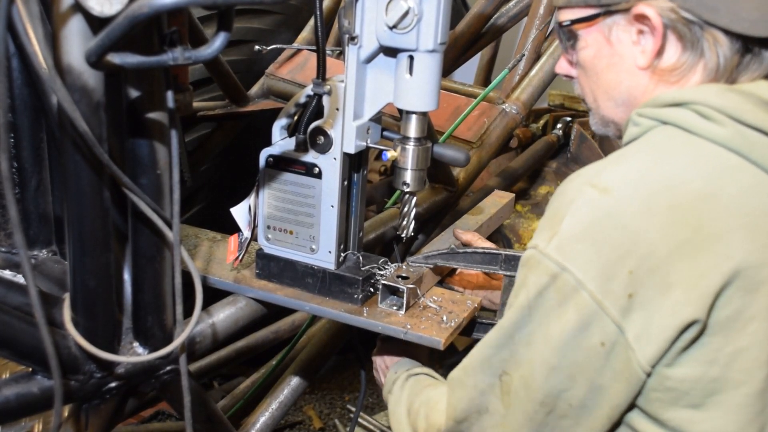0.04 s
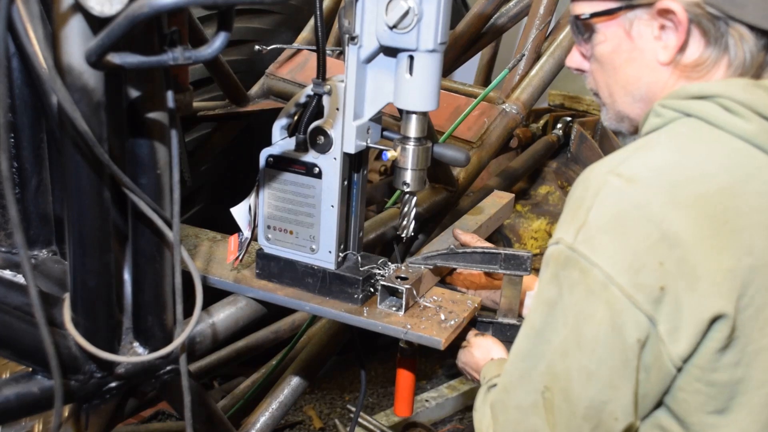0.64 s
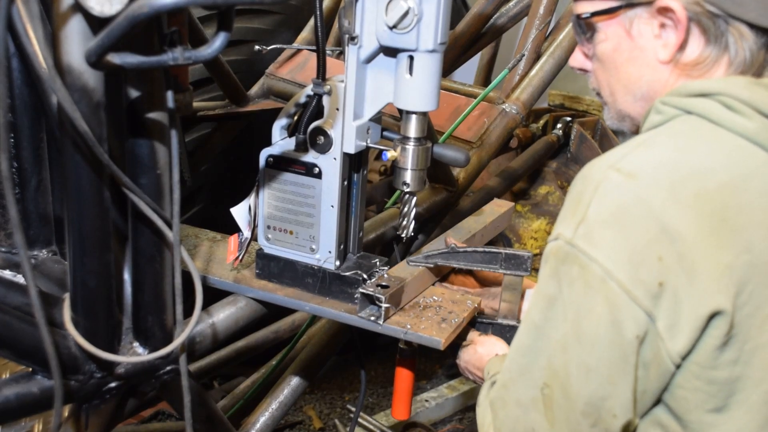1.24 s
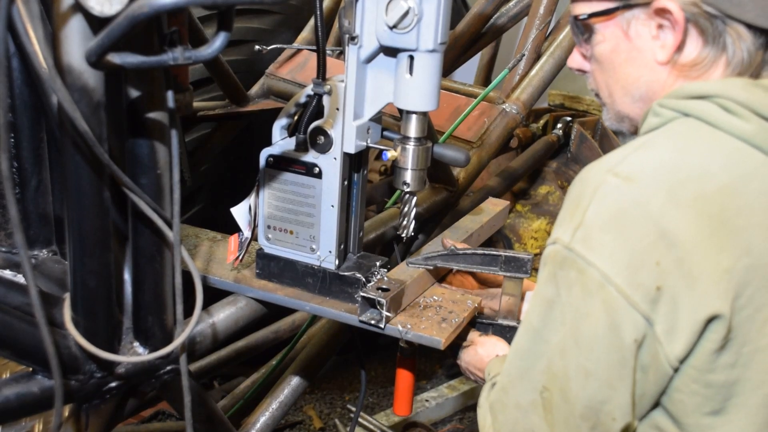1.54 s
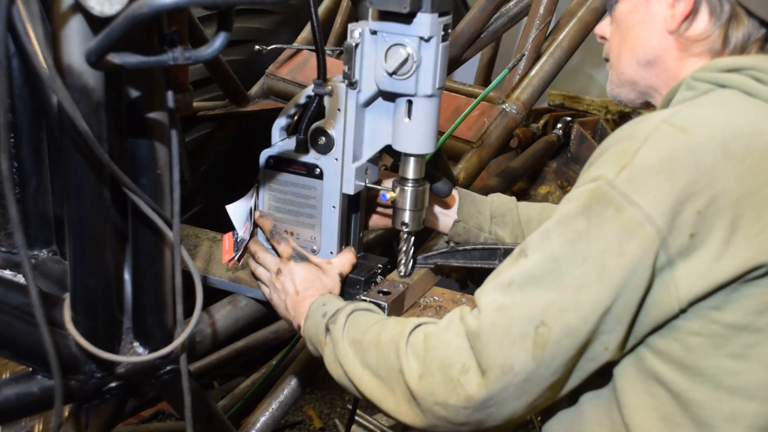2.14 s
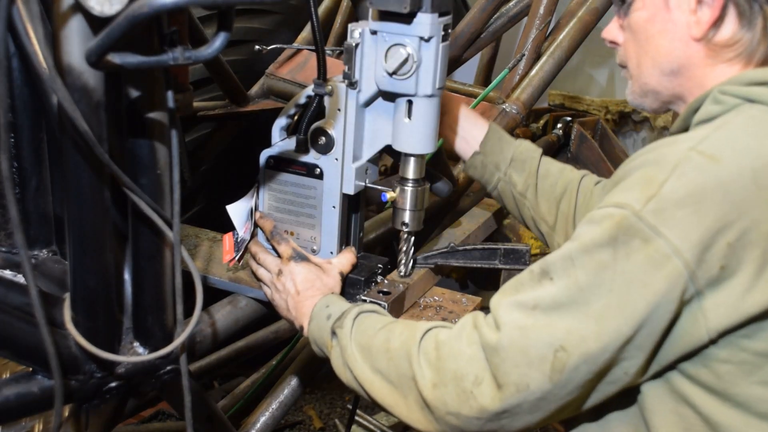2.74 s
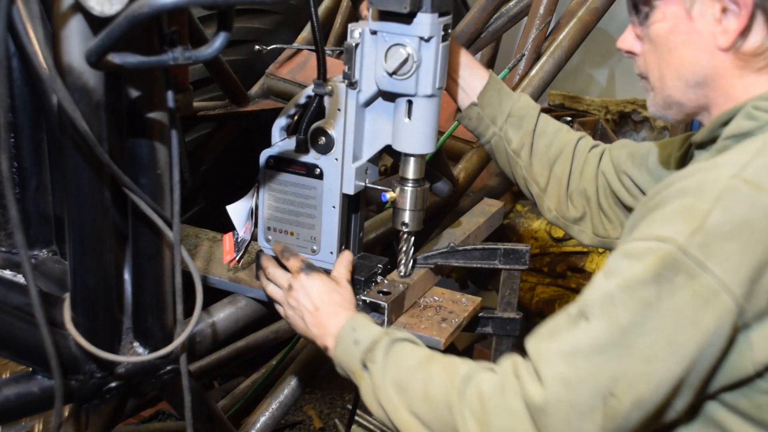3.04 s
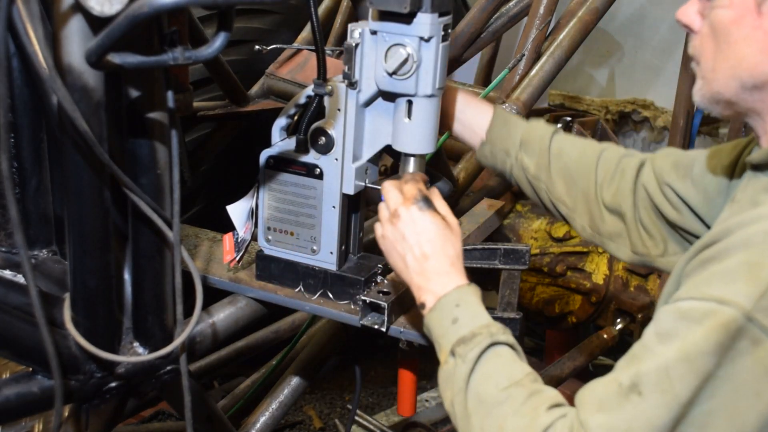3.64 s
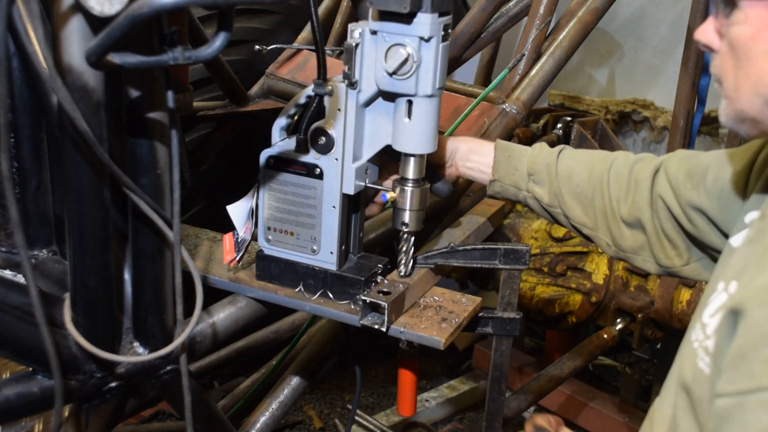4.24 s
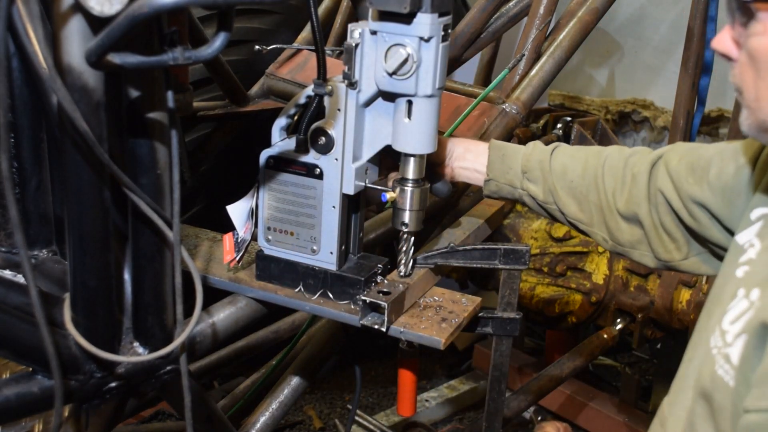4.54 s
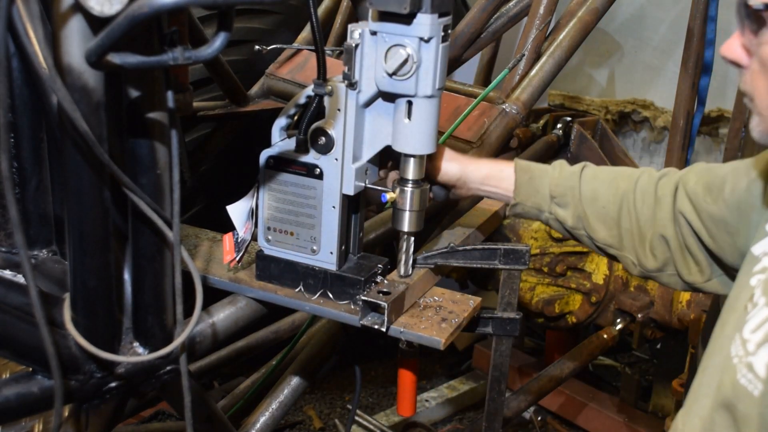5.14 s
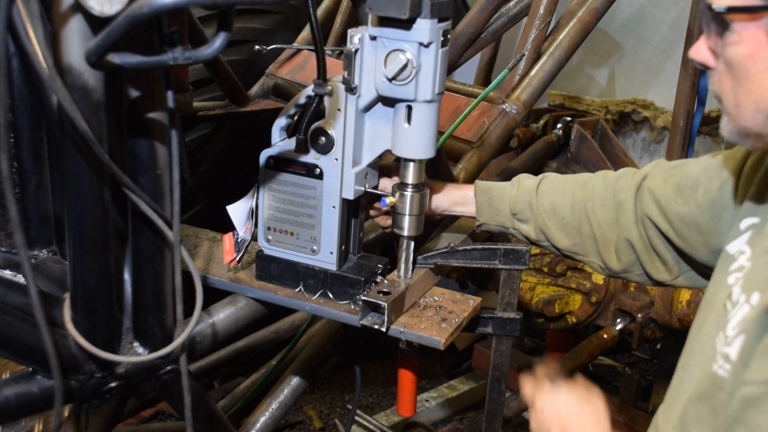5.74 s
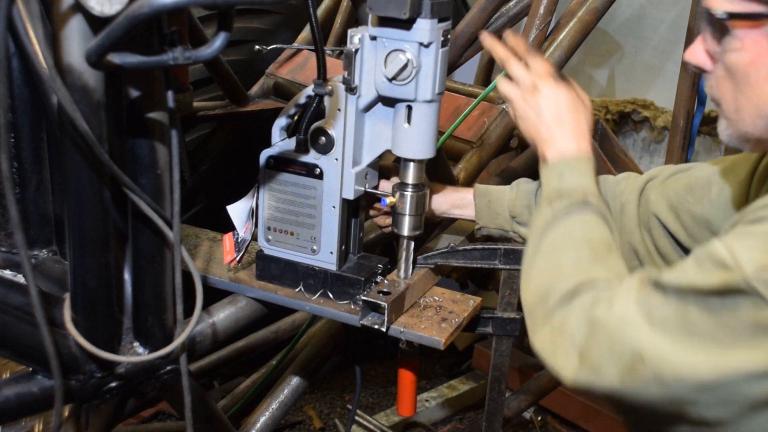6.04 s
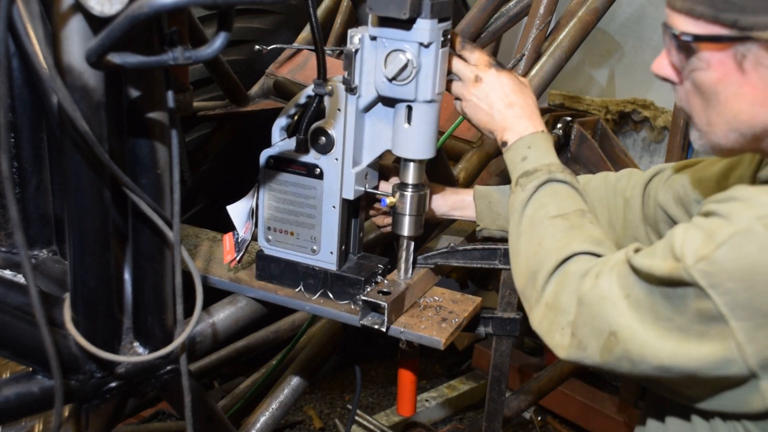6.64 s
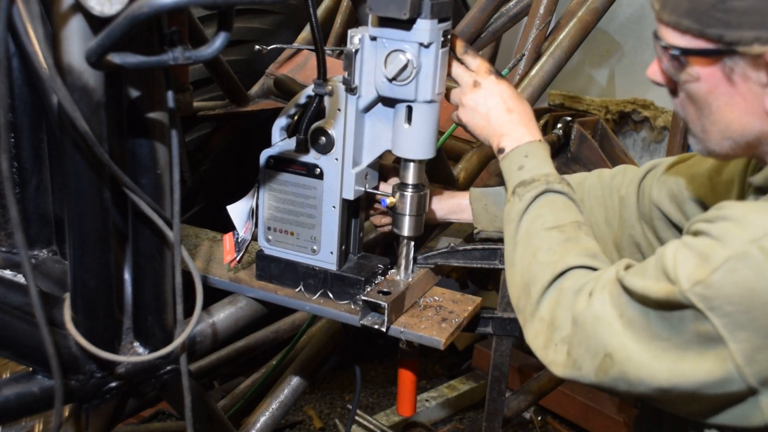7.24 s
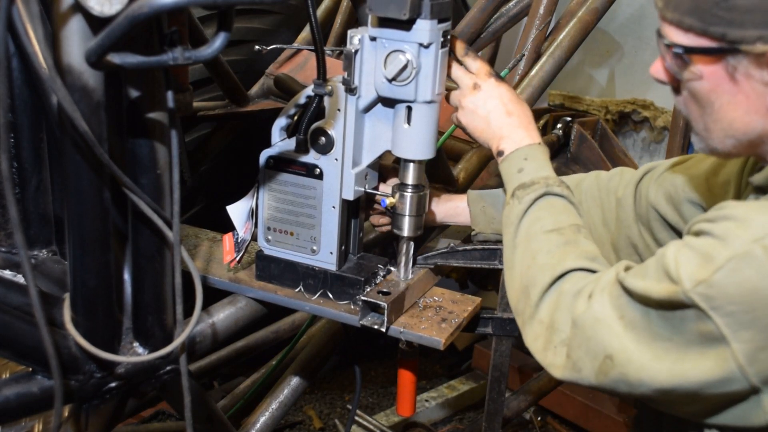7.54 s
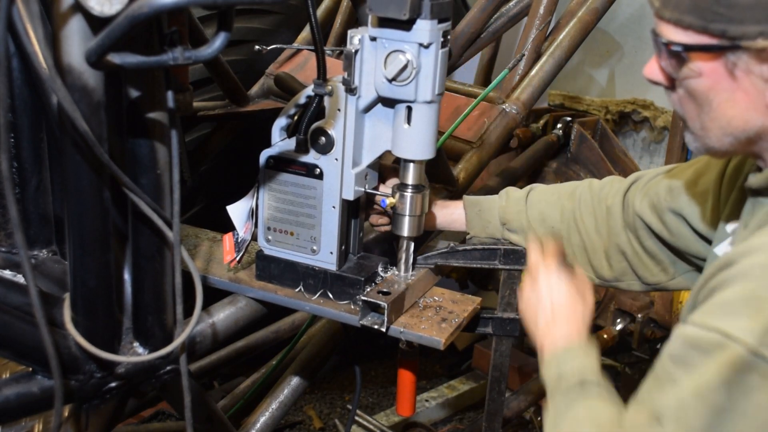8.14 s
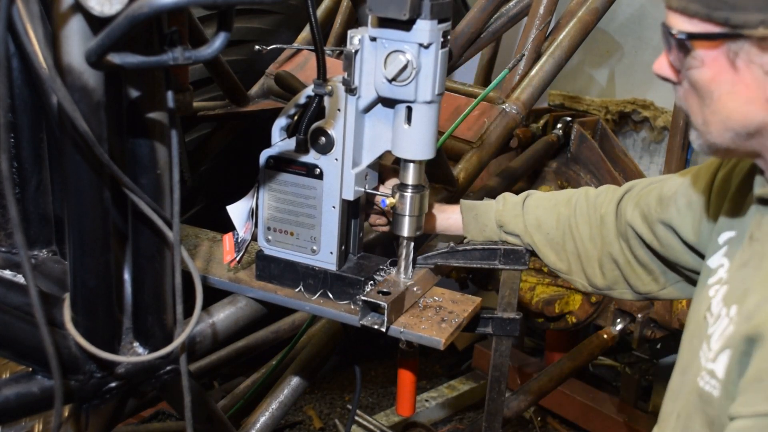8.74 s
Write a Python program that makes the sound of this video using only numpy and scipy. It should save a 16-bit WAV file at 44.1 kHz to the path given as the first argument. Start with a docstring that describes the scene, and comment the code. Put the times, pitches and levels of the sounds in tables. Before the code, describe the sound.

Steel scrapes softly into place, a switch snaps, then a drill motor whines up to speed and runs loudly in a small workshop.

```python
"""A magnetic drill press in a small, hard-walled workshop, heard close on a stereo pair of microphones.
Over distant ventilation, a steel workpiece scrapes and ticks into place. A switch snaps at 2.2 s,
and hands brush the machine. At 4.6 s the motor jolts into life and its fan whine sweeps up, with a
brief raspy ring on the way. Cooling air, brushes and gears rush on loudly; from about 7 s
the speed sags a little and the shaft hums harder as the bit bears on the steel."""
import sys
import numpy as np
from scipy import signal
from scipy.fft import rfft, irfft
from scipy.io import wavfile
from scipy.ndimage import uniform_filter1d

SR = 44100
rng = np.random.default_rng(int(sys.argv[2]) if len(sys.argv) > 2 else 0)


def store_pcm(level_fs):
    """Save levels as 16-bit WAV."""
    pcm = np.round(np.clip(level_fs, -1, 1) * 32767).astype(np.int16)
    wavfile.write(sys.argv[1], SR, np.atleast_2d(pcm).T)


N = 396459
TIME = np.arange(N) / SR

# Levels are at the source, ahead of any colouring and the gains of room().
# stereo width of the room, side against mid: frequency_hz, gain_db
SIDE_COLOUR = [(60, -66), (400, -23), (1000, -31.5), (2000, -18.5), (4000, -3.5), (8000, -4.5), (13000, 2)]
# self-noise of the microphones: frequency_hz, gain_db
HISS_COLOUR = [(40, -14), (200, -13), (500, 4.5), (1600, 3), (3000, -0.5), (5000, -5), (8000, -14),
               (12000, -17), (15500, -21)]
# air in the distant ventilation: frequency_hz, gain_db
VENT_COLOUR = [(25, -22), (48, -24), (65, -4.5), (90, -29), (130, -17.5), (195, -19.5), (245, -6.5),
               (420, 0.5), (600, -2), (820, 3), (1200, -7.5), (1900, -23.5), (4000, -36), (10000, -37.5),
               (15500, -48)]
# steady tones of the ventilation: pitch_hz, level_db
VENT_TONES = [(64.6, -79), (662, -70), (818, -62), (1028, -75), (1260, -62.5), (2094, -76.5), (3330, -83)]
# shoves of the steel over the work plate: start_s, length_s, scrape_db, grumble_db
STEEL_SHOVES = [(-0.03, 0.058, -47, -33), (0.638, 0.12, -44.5, -48), (.9, .03, -49, -70),
                (1.042, 0.14, -33.5, -34.5), (1.233, 0.083, -38, -35), (1.356, .03, -48, -45),
                (1.745, .035, -63, -75)]
# hiss of sliding on steel: frequency_hz, gain_db
SCRAPE_COLOUR = [(200, -14), (700, 4.5), (1500, 7.5), (2400, 2), (2750, 1), (3400, -0.5), (3900, 2),
                 (4400, 0), (5700, -0.5), (8200, -4.5), (10000, -10), (13000, -18), (15500, -32)]
# low grumble of the shaken plate: frequency_hz, gain_db
PLATE_COLOUR = [(50, -54), (140, -17), (215, -20), (285, 9.5), (350, -5), (480, 1), (680, -6.5), (1000, -5),
                (1450, -6), (1800, -16.5), (3000, -28), (10000, -61)]
# modes of the steel work plate: pitch_hz, width_hz, level_db
PLATE_MODES = [(1470, 25, -6), (2684, 41, 3), (2740, 33, 2.5), (3120, 40, -11), (3880, 55, -2),
               (4160, 45, -5), (4830, 50, -6), (5600, 70, 1), (6200, 70, -5), (7680, 64, -3)]
# light ticks of metal edges: start_s, level_db
EDGE_TICKS = [(.0294, -42), (.9103, -34), (1.7594, -46), (2.8893, -41), (2.9894, -50), (3.1094, -55),
              (3.5194, -50), (4.5834, -50)]
# bright tone of those ticks: frequency_hz, gain_db
EDGE_COLOUR = [(500, -25), (2800, -16), (3800, 10), (5000, 9), (7000, 6), (10000, 3), (15000, -10)]
# hands brushing the machine: start_s, length_s, level_db
HAND_STROKES = [(2.96, .07, -65), (3.16, 0.15, -61.5), (3.495, .05, -57)]
# the switch snaps over and rattles home: start_s, level_db
SWITCH_HITS = [(2.1766, -17), (2.1842, -40), (2.1897, -19.5), (2.1932, -17)]
# the casing as the switch knocks it: frequency_hz, gain_db
SWITCH_COLOUR = [(200, -30), (500, -15), (1050, -18), (1380, 6), (1550, 8), (1800, 2), (2100, -11),
                 (2700, -4.5), (3300, -3), (3700, -8), (4150, -5), (6000, -18), (8000, -18), (11000, -27),
                 (15000, -43)]
# the gears clatter as they take up their slack: start_s, level_db
GEAR_KNOCKS = [(4.6025, -23), (4.612, -16.5), (4.6215, -13.5)]
# tone of the knocking teeth: frequency_hz, gain_db
GEAR_COLOUR = [(40, -48), (120, -20), (400, -7), (850, 8), (1300, -20), (2100, -6), (2700, 9), (3300, -16),
               (5000, -28), (14000, -42)]
# short bursts of ringing during spin-up: start_s, length_s, level_db
RING_BURSTS = [(4.698, 0.021, -21.5), (4.735, 0.023, -15.5), (4.76, .012, -18)]
# weaker shaft harmonics: multiple, free_db, loaded_db
SHAFT_HARMONICS = [(2, -33, -29.5), (6, -35, -26.5), (7, -39, -38), (8, -36, -42), (9, -35, -44),
                   (10, -44, -40), (11, -44, -38), (12, -35.5, -32.5), (14, -43, -48), (25, -48, -46)]
# inrush current at switch-on: time_s, share_of_peak
INRUSH_CURRENT = [(4.61, 0), (4.67, 1), (4.69, 1), (4.717, 0)]
# standing waves that flare or fade the passing whine: pitch_hz, half_width_hz, gain_db
WHINE_WAVES = [(3500, 220, -5), (4400, 330, 6), (4930, 120, 6), (5187, 22, 8.5), (5400, 90, -2.5),
               (5690, 10, -11)]
# modes of the motor housing: pitch_hz, width_hz, level_db
HOUSING_MODES = [(1416, 70, -2), (2442, 52, -4.5), (2725, 80, -4.5), (3444, 60, 1), (4036, 260, -6.5),
                 (7380, 400, -9.5), (9340, 570, -10.5)]
# roar of cooling air, brushes and gears: frequency_hz, gain_db
ROAR_COLOUR = [(60, -42.5), (180, -29.5), (225, -24.5), (280, -12), (350, -13.5), (520, -7), (850, -1),
               (1500, 2), (2800, 0.5), (3150, -4), (5500, -7), (6300, -9.5), (8200, -7), (11300, -10.5),
               (13500, -18.5), (15500, -36)]
# feed pressure on the bit drags the shaft down: time_s, speed_lost_hz
FEED_DRAG = [(5.65, 0), (6.25, 3.6), (6.75, 8.7), (7.15, 24), (7.5, 36.3), (7.85, 44), (8.2, 39),
             (8.7, 39.8), (8.99, 43)]
# the roar comes on, the tones come in, the whine steadies: time_s, share
ROAR_ONSET = [(4.583, .13), (4.595, .79)]
TONE_ONSET = [(4.6, .032), (4.62, 1)]
WHINE_STEADINESS = [(4.7, .026), (5.4, .83)]

FREE_HZ = 442.9  # shaft speed with no load


def undb(db):
    """Decibels to gain."""
    return 10 ** (np.asarray(db) / 20)


def unit(x):
    """Scale to rms 1."""
    return x / np.sqrt(np.mean(x ** 2))


def curve(table):
    """Join (time_s, value) rows with straight lines."""
    return np.interp(TIME, *np.transpose(table))


def bell(x, centre, width):
    """1 at the centre, falling smoothly to 0 on both sides."""
    return np.exp(-((x - centre) / width) ** 2)


def noise():
    """White noise."""
    return rng.standard_normal(N)


def walk(rate_hz):
    """Smooth random wandering, rms 1."""
    hold = int(SR / rate_hz)
    steps = np.repeat(rng.standard_normal(N // hold + 1), hold)
    return unit(uniform_filter1d(steps, hold)[:N])


def flutter(depth, rate_hz):
    """Uneven swelling and dropping out, at constant mean power."""
    return (1 + depth * walk(rate_hz)) / np.sqrt(1 + depth ** 2)


def swells(rows, attack_s, release_s):
    """Attack, hold and exponential release for each (start_s, length_s, level_db) row."""
    envelope = np.zeros(N)
    for start_s, length_s, level_db in rows:
        attack = np.clip((TIME - start_s) / attack_s, 0, 1)
        release = np.exp(-np.maximum(TIME - start_s - length_s, 0) / release_s)
        envelope += undb(level_db) * attack * release
    return envelope


def blows(rows, contact_s):
    """A short burst of contact noise at each (start_s, level_db) row."""
    t = TIME[:SR // 20]
    out = np.zeros(N)
    for start_s, level_db in rows:
        burst = rng.standard_normal(len(t)) * np.exp(-t / contact_s)
        start = int(start_s * SR)
        out[start:start + len(t)] += undb(level_db) * burst
    return out


def colour(x, outline):
    """Minimum-phase filter with the given (frequency_hz, gain_db) outline."""
    size = 2 ** 19
    hz, db = np.transpose(outline)
    bins_hz = np.arange(size // 2 + 1) * SR / size
    gain = undb(np.interp(np.log(bins_hz + 1), np.log(hz), db))
    cepstrum = irfft(np.log(gain))
    cepstrum[1:size // 2] *= 2  # folded forward, so nothing rings ahead of a hit
    cepstrum[size // 2 + 1:] = 0
    return irfft(rfft(x, size) * np.exp(rfft(cepstrum)))[:N]


def resonance(x, pitch_hz, width_hz):
    """Band-pass with gain 1 at the centre."""
    return signal.lfilter(*signal.iirpeak(pitch_hz, pitch_hz / width_hz, SR), x)


def room(x, direct_db, wet_db, low_t60_s=.5, treble_t60_s=.32):
    """Direct sound and a dense tail off the walls; the close pair parts left from right in the treble."""
    t = TIME[:SR * 3 // 4]
    echoes = rng.standard_normal((2, len(t))) * (1 - np.exp(-t / .004))
    low = signal.sosfiltfilt(signal.butter(1, 5000, fs=SR, output="sos"), echoes)
    tails = low * undb(-60 * t / low_t60_s) + 1.39 * (echoes - low) * undb(-60 * t / treble_t60_s)
    tails *= undb(wet_db) / np.linalg.norm(tails, axis=1, keepdims=True)
    mid, side = (signal.fftconvolve(x, tail)[:N] for tail in tails)
    return undb(direct_db) * x + mid + np.outer([1, -1], colour(side, SIDE_COLOUR))


def microphone_hiss():
    """Each microphone adds its own faint noise."""
    return undb(-61.5) * np.array([unit(colour(noise(), HISS_COLOUR)) for _ in range(2)])


def ventilation():
    """A distant fan, more room than direct sound: dull, steady air with a few faint tones."""
    air = unit(colour(noise(), VENT_COLOUR)) * undb(-46.5 + .5 * walk(4.34))
    tones = sum(undb(db + 2 * walk(4.95)) * np.sin(2 * np.pi * hz * TIME + 1.4 * walk(7.9))
                for hz, db in VENT_TONES)
    return room(air, direct_db=-6.5, wet_db=-1) + np.sqrt(2) * tones


def handling():
    """Tiny slips of steel on steel hiss, ring and shake the plate; edges tick and hands brush by."""
    slips = noise() * undb(3 * walk(500) + 1.8 * walk(60))
    pressure = swells([(s, span, db) for s, span, db, _ in STEEL_SHOVES], attack_s=.052, release_s=.043)
    weight = swells([(s, span, db) for s, span, _, db in STEEL_SHOVES], attack_s=.09, release_s=.055)
    hands = swells(HAND_STROKES, attack_s=.03, release_s=.06)
    # the moving contact favours one mode after another; hands alone do not ring the plate
    ring = unit(sum(undb(db + 3 * walk(14)) * resonance(slips, hz, width)
                    for hz, width, db in PLATE_MODES))
    scrape = undb(-1) * unit(colour(slips, SCRAPE_COLOUR)) * (pressure + hands)
    grumble = unit(colour(slips, PLATE_COLOUR)) * weight
    sliding = scrape + undb(-6.5) * ring * pressure + grumble
    ticks = colour(blows(EDGE_TICKS, contact_s=.0023), EDGE_COLOUR)
    return room(sliding, direct_db=-1.5, wet_db=-4) + room(ticks, direct_db=-8.5, wet_db=-4)


def switch():
    """A hard snap knocks the casing, which rings briefly near 1.5 and 3.3 kHz, and fills the room."""
    snap = colour(blows(SWITCH_HITS, contact_s=.0024), SWITCH_COLOUR)
    return room(snap, direct_db=16, wet_db=16)


def gear_jolt():
    """The first kicks of the motor knock the gear teeth together."""
    clatter = colour(blows(GEAR_KNOCKS, contact_s=.003), GEAR_COLOUR)
    return room(clatter, direct_db=13, wet_db=9)


def raspy_ring(pitch_hz=2770):
    """Short raspy bursts of ringing near 2.77 kHz follow the whine's loud first surge."""
    envelope = swells(RING_BURSTS, attack_s=.01, release_s=.014) * flutter(.4, 170)
    tone = np.sqrt(2) * np.sin(2 * np.pi * pitch_hz * TIME + .9 * walk(200))
    return room(envelope * tone, direct_db=0, wet_db=-12)


def shaft_hum(speed_hz, angle, load):
    """Once-a-turn shaft tone; it wavers while the motor runs free and steadies under load."""
    free_db, cutting_boost_db, spin_up_boost_db = -30, 8.3, 15
    spin_up_strain = (1 - speed_hz / FREE_HZ) * (1 - load)
    waver = flutter(.5 - .44 * load, 26)
    wobble = 2.5 * spin_up_strain * walk(70)
    radiated = 1 / (1 + (275 / np.maximum(speed_hz, 1)) ** 12)  # little leaves the casing below 275 Hz
    level_db = free_db + cutting_boost_db * load + spin_up_boost_db * spin_up_strain
    tone = undb(level_db) * radiated * waver * np.sqrt(2) * np.sin(angle + wobble)
    return room(tone, direct_db=-.7, wet_db=-22)


def fan_whine(speed_hz, angle, load, blades=13, throb_hz=104):
    """Blade tones and shaft harmonics; inrush current deepens the blades' throb at twice the mains rate."""
    inrush, steady = curve(INRUSH_CURRENT), curve(WHINE_STEADINESS)
    flare_db = sum(db * bell(blades * speed_hz, hz, width) for hz, width, db in WHINE_WAVES)
    blade_db = -25.5 + 20 * inrush + flare_db
    throb = 1 + (.15 + .65 * inrush) * np.cos(2 * np.pi * throb_hz * (TIME - 4.673))
    rasp = (.08 + .9 * (1 - steady) * (1 - .55 * inrush)) * walk(220)
    sputter = flutter((1 - inrush) * (.6 - .34 * steady), 60)
    blade_tone = undb(blade_db) * sputter * throb * np.sin(blades * angle + rasp)
    high_speed = np.clip((speed_hz - 285) / 80, 0, 1)
    overtones = np.sin(2 * blades * angle) + undb(-20) * np.sin(3 * blades * angle)
    overtones *= undb(-28.6 - 5.7 * load) * high_speed * flutter(.42, 35)
    harmonics = np.zeros(N)
    for multiple, free_db, loaded_db in SHAFT_HARMONICS:
        level_db = free_db + load * (loaded_db - free_db) + 2 * walk(9)
        harmonics += undb(level_db) * np.sin(multiple * angle + rng.uniform(0, 2 * np.pi))
    turning = np.clip(speed_hz / 100, 0, 1)  # silent at standstill
    whine = np.sqrt(2) * turning * (blade_tone + overtones + steady * harmonics)
    return room(whine, direct_db=-.5, wet_db=-11)


def air_rush(speed_hz, level_db_per_octave=5.5, treble_db_per_octave=10):
    """Air, brushes and gear teeth roar through the housing, louder and brighter with speed."""
    octaves = np.log2(np.maximum(speed_hz, 1) / FREE_HZ)
    surge_db = 8 * bell(TIME, centre=4.635, width=.024)  # the brushes roar as the current comes on
    rattle_db = 4.5 * bell(speed_hz, centre=338.5, width=46.7)  # the gears rattle around this speed
    level_db = -19 + level_db_per_octave * octaves + surge_db + rattle_db
    drive = curve(ROAR_ONSET) * undb(level_db + .25 * walk(20))
    angle = 2 * np.pi * np.cumsum(speed_hz) / SR
    chop = 1 + .32 * np.cos(2 * angle)  # the air is chopped twice a turn
    air = colour(drive * chop * noise(), ROAR_COLOUR)
    air += sum(undb(db + walk(25)) * resonance(drive * noise(), hz, width)
               for hz, width, db in HOUSING_MODES)
    low = signal.sosfiltfilt(signal.butter(2, 3600, fs=SR, output="sos"), air)
    roar = low + undb(treble_db_per_octave * octaves + 1.55) * (air - low)
    return room(roar, direct_db=13, wet_db=7.5)


def motor():
    """The drill kicks, climbs slowly to free speed, then sags as the bit is fed into the steel."""
    start_s, kick_share, kick_s, settle_s = 4.5733, .473, .0936, .3333
    age_s = np.maximum(TIME - start_s, 0)
    shortfall = kick_share * np.exp(-age_s / kick_s) + (1 - kick_share) * np.exp(-age_s / settle_s)
    drag_hz = curve(FEED_DRAG)
    speed_hz = FREE_HZ * (1 - shortfall) - drag_hz
    load = np.interp(drag_hz, (14, 23), (0, 1))  # the bit takes hold between these losses of speed
    angle = 2 * np.pi * np.cumsum(speed_hz * (1 + .00046 * walk(40))) / SR
    roar = air_rush(speed_hz)
    tones = shaft_hum(speed_hz, angle, load) + fan_whine(speed_hz, angle, load) + raspy_ring()
    return roar + curve(TONE_ONSET) * tones


def scene():
    """The workshop as the two microphones pick it up."""
    return ventilation() + handling() + switch() + gear_jolt() + motor() + microphone_hiss()


def record(dry):
    """The recorder rounds off peaks near full scale and cuts the top above 15.55 kHz."""
    rounded = dry / (1 + dry ** 8) ** (1 / 8)
    return signal.sosfilt(signal.ellip(10, .1, 70, 15550, fs=SR, output="sos"), rounded)


dry = scene()
out = record(dry)
store_pcm(out)
```